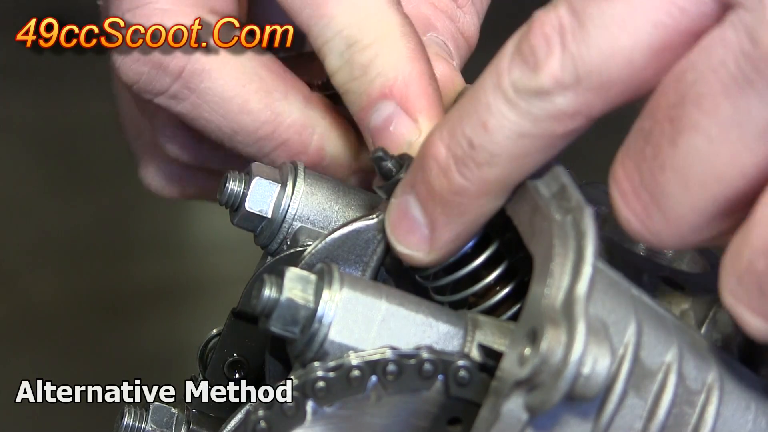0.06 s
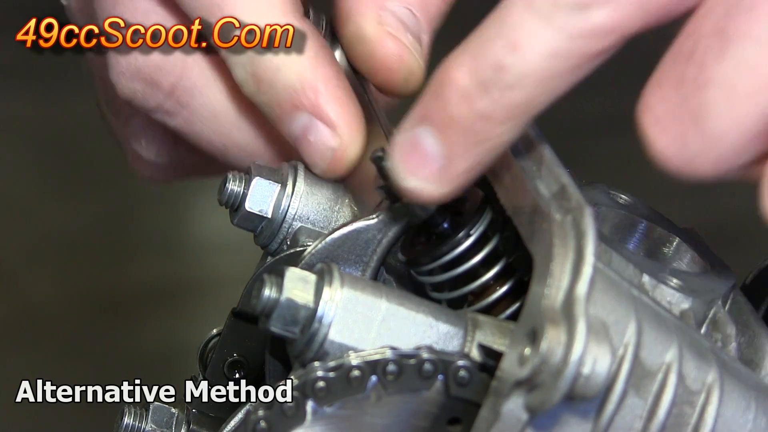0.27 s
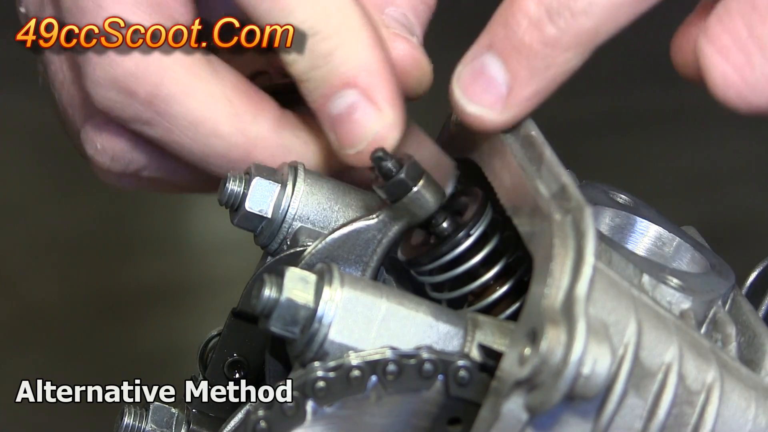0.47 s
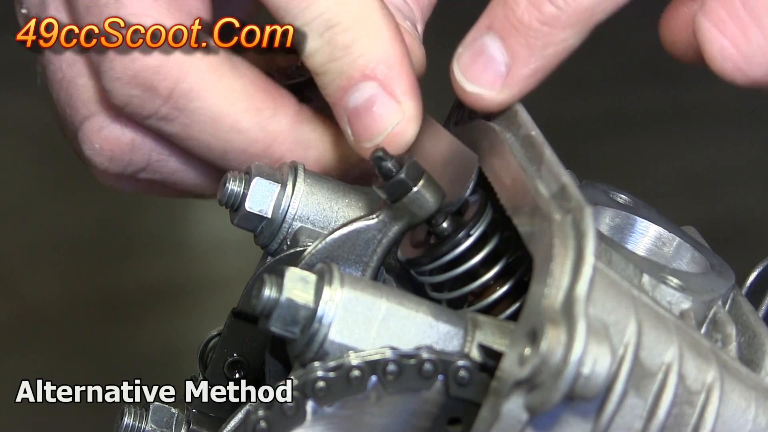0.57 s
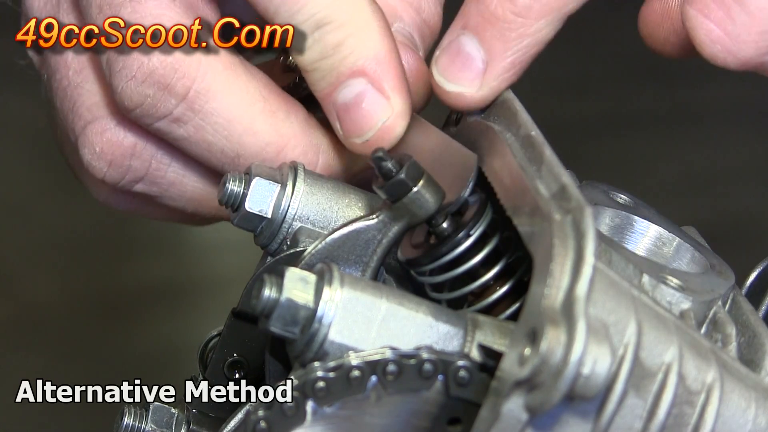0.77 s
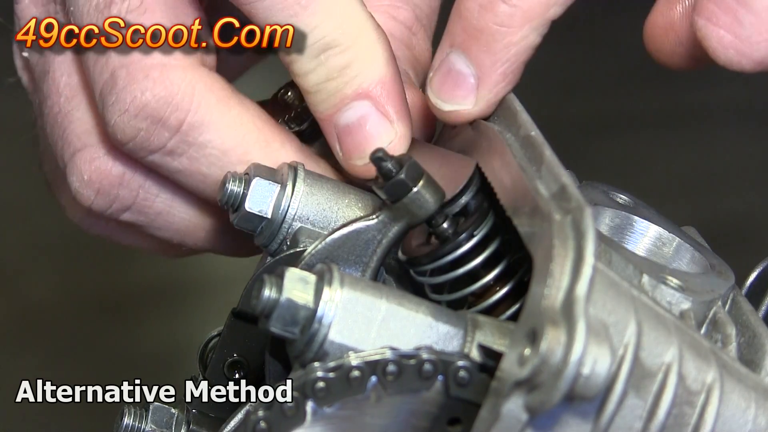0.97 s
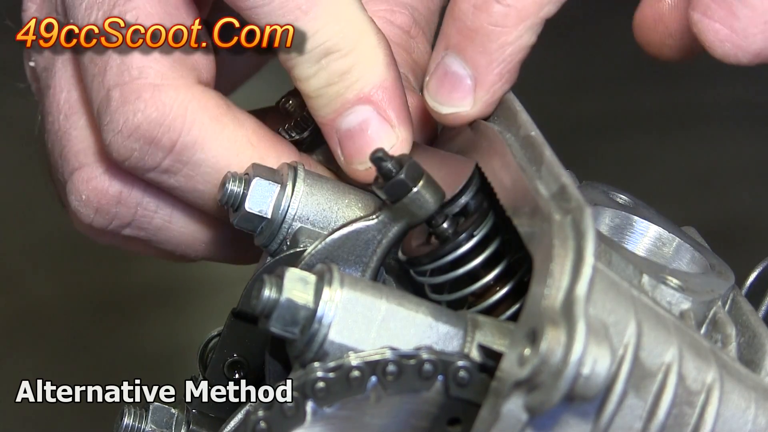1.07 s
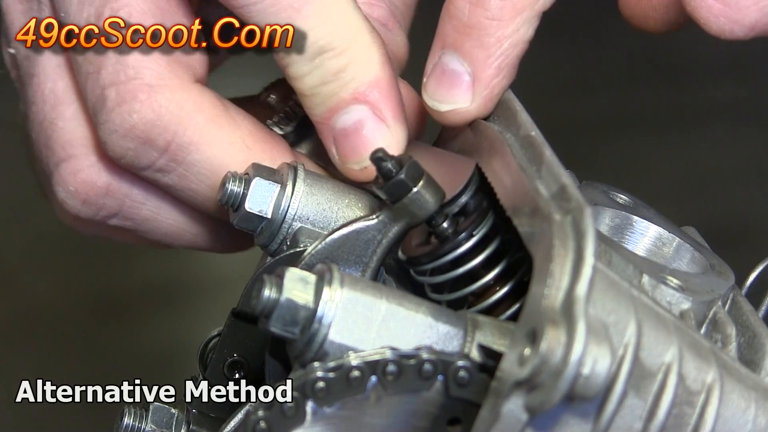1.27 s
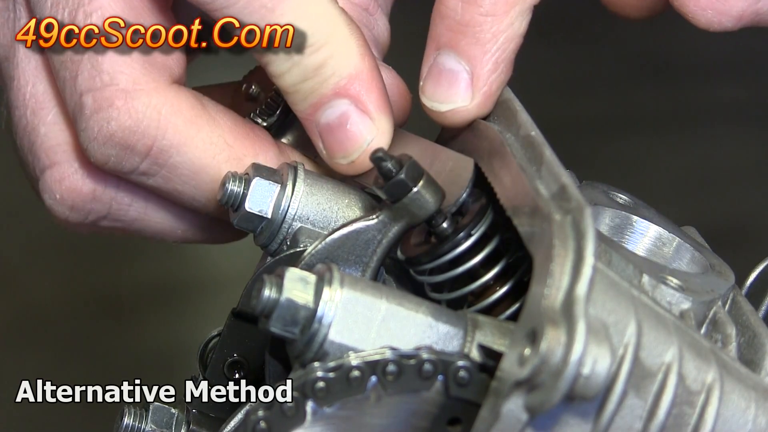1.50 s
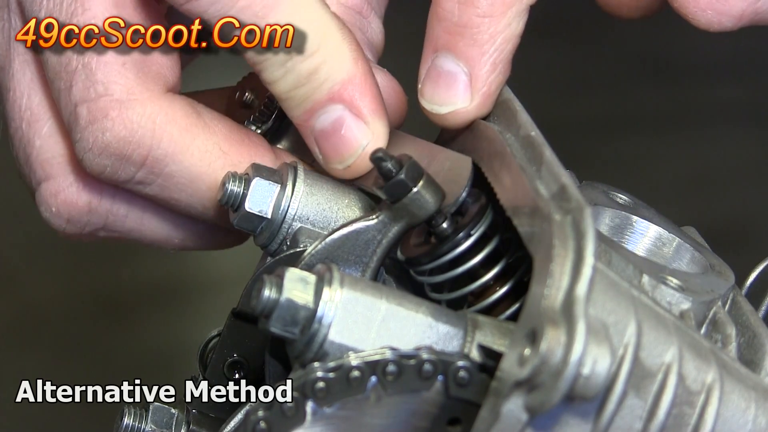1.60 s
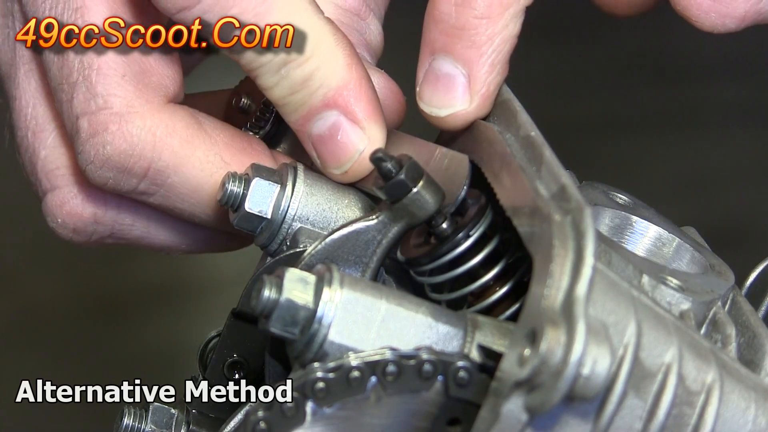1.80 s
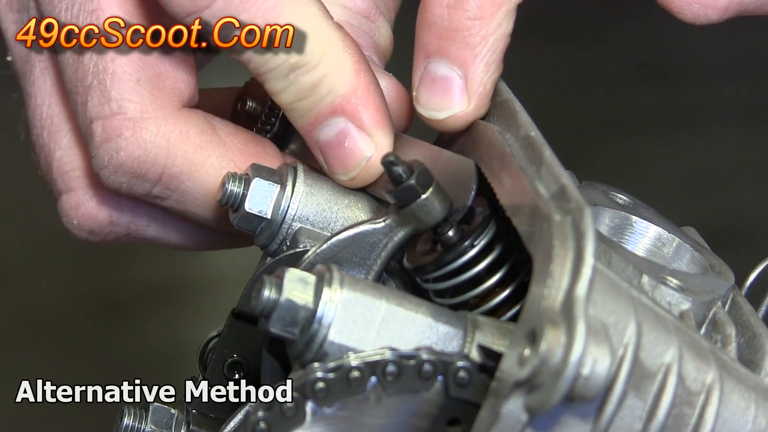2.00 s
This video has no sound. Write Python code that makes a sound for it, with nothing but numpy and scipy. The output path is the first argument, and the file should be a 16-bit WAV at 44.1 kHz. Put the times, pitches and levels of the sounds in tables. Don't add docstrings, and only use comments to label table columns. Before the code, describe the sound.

Metal clicking: thin steel blades knock and tick against small engine parts in a quiet workshop

```python
import sys
import numpy as np
from scipy import signal
from scipy.fft import rfft, irfft
from scipy.io import wavfile
from scipy.ndimage import uniform_filter1d

SR = 44100
rng = np.random.default_rng(int(sys.argv[2]) if len(sys.argv) > 2 else 0)


def voltage_ratio(level):
    return 10 ** (np.asarray(level, float) / 20)


def int16_out(signal):
    q = np.round(np.clip(np.atleast_2d(signal).T, -1, 1) * 32767)
    wavfile.write(sys.argv[1], SR, q.astype(np.int16))


N = 90404
RISE_MS = 0.46


def evened(x):
    return x / np.sqrt(np.mean(x ** 2) + 1e-20)


def read(points, hz):
    f, value = np.transpose(points)
    return np.interp(np.log(hz + 1), np.log(f + 1), value)


def add(mix, s, sound):
    part = mix[round(s * SR):][:len(sound)]
    part += sound[:len(part)]


def damped(peaks):
    narrowest_hz = 111
    modes = []
    for hz, width_hz, db in peaks:
        width_hz = max(width_hz, narrowest_hz)
        t60 = np.log(1000) / np.pi / width_hz
        modes.append((hz, db + 20 * np.log10(width_hz), t60))
    return modes


def ring(modes, t, force=np.ones(1), neighbour=-1.02):
    spot_db, detune, soft_turns = 1, 0.005, 0.9
    weakest_drive = 0.067
    hz, db, t60 = np.transpose([*modes, *modes])[:, :, None]
    spot, tune = rng.standard_normal((2, len(hz), 1))
    hz = hz * (1 + detune * tune)
    drive = abs(np.exp(2j * np.pi * hz * t[:len(force)]) @ force)[:, None]
    drive = np.maximum(drive, weakest_drive * np.linalg.norm(force))
    sign = neighbour ** (np.arange(len(hz))[:, None] % len(modes))
    decay = voltage_ratio(db + spot_db * spot - 60 * t / t60)
    swell = 1 - np.exp(-(hz * t / soft_turns) ** 2)
    return (sign * decay * swell * np.sin(2 * np.pi * hz * t) / drive).sum(0)


def whitened(force, push):
    size = np.linalg.norm(force)
    for _ in range(4):
        z = rfft(force, 2048)
        flat = irfft(z / (abs(z) + 1e-9))[:len(force)] * size
        force = np.clip(flat, -2.5 * push, 2.5 * push)
    return force


def chatter(chatter_ms, rise_ms):
    impacts_per_ms, spread_db = 14.0, 2
    ms = 1000 * np.arange(900) / SR
    hit, size, sign = rng.random((3, len(ms)))
    push = np.minimum(ms / rise_ms, 1) ** 2 * np.exp(-np.maximum(ms - rise_ms, 0) / chatter_ms)
    strength = voltage_ratio(-spread_db * np.log(size + 0.01))
    force = push * (hit < impacts_per_ms * 1000 / SR) * np.sign(sign - 0.5) * strength
    return whitened(force, push)


def click(parts, levels_db, chatter_ms, rise_ms=RISE_MS):
    blur = 6
    t = np.arange(1600) / SR
    force, out = chatter(chatter_ms, rise_ms), 0
    for db, modes in zip(levels_db, parts):
        mid = signal.fftconvolve(force, ring(modes, t, force))
        side = signal.fftconvolve(force, ring(modes, t, force))
        broad = [(hz, level, t60 / blur) for hz, level, t60 in modes]
        around = ring(broad, np.arange(len(mid)) / SR, neighbour=0.93)
        smooth = uniform_filter1d(abs(rfft(around)), size=50)
        around = np.roll(irfft(smooth, len(mid)), 40)
        around = evened(around) * mid.std()
        out = out + voltage_ratio(db) / abs(mid).max() * np.array([mid, side, around]).T
    return out


# (f/Hz, level/dB per Hz)
HISS = [(30, -42), (45, -18), (90, 0), (150, -0.5), (500, -4.5), (1860, -9), (5000, -18), (16000, -29.5)]
# (f/Hz, likeness 0-1)
COHERENCE = [(60, 1), (180, 0.38), (550, 0.25), (1650, 0.77), (4970, 0.61), (15000, 0.089)]


def hiss():
    frames, hz = N // 256 + 5, np.fft.rfftfreq(1024, 1 / SR)
    a, b, c, d = rng.standard_normal((4, len(hz), frames))
    same = np.clip(read(COHERENCE, hz), -1, 1)[:, None]
    left = a + 1j * b
    right = same * left + np.sqrt(1 - same ** 2) * (c + 1j * d)
    z = np.array([left, right]) * voltage_ratio(read(HISS, hz)[:, None])
    noise = signal.istft(z, nperseg=1024, noverlap=768)[1][:, :N]
    return voltage_ratio(-58) * evened(noise)


def drift(hz):
    t = np.arange(N) / SR
    return evened(sum(np.sin(2 * np.pi * (f * t + rng.random())) for f in np.geomspace(hz / 8, hz, 9)))


# (f/Hz, level/dB, waver/dB)
HUM = [(58, -64, -0.5), (115.1, -66, -3.5), (118.6, -85.5, 1)]


def hum():
    t, out = np.arange(N) / SR, 0
    for hz, db, waver_db in HUM:
        level = voltage_ratio(db + waver_db * drift(hz=16.0)) * np.sqrt(2)
        out = out + level * np.sin(2 * np.pi * hz * t + 0.38 * drift(hz=5.98))
    return out


# (f/Hz, level/dB, t60/s)
HEAD = [(412, -9.5, 0.02), (535, -4, 0.033), (653, -6, 0.022), (893, 0, 0.013), (993.5, -2, 0.045),
        (1269, 3, 0.015), (1680, 3, 0.0057)]
# (t/s, level/dB)
THUDS = [(0.206, -29), (.313, -37), (0.519, -37.5), (0.527, -36.5), (0.558, -50), (0.591, -40.5),
         (.625, -41), (0.65, -42.5), (.685, -49), (.948, -36.5), (.957, -42), (.967, -41), (1.005, -48.5),
         (1.457, -35.5), (1.480, -43), (1.9214, -48.5)]


def thuds(metal):
    for s, db in THUDS:
        add(metal, s, click([HEAD], [db], chatter_ms=2.7))


# (f/Hz, t60/s)
SHOP_DECAY = [(250, 0.95), (1000, 0.65), (2400, 0.81), (5000, 0.74), (9000, 0.6), (14000, 0.21)]
# (f/Hz, level/dB)
SHOP_COLOUR = [(300, 13), (1200, 8.5), (2400, 5.2), (5000, 0.7), (9000, -1), (14000, 6.5)]


def shop(x):
    tail_db, rise_s, same = -14, 0.0022, 0.88
    hz, t, z = signal.stft(rng.standard_normal((2, SR)), SR, nperseg=256)
    decay_db = 60 * t / read(SHOP_DECAY, hz)[:, None]
    z = z * voltage_ratio(read(SHOP_COLOUR, hz)[:, None] - decay_db)
    tail = signal.istft(z, SR, nperseg=256)[1]
    left, other = tail * np.minimum(np.arange(tail.shape[1]) / SR / rise_s, 1)
    right = same * left + np.sqrt(1 - same ** 2) * other
    tail = np.array([left, right]) * voltage_ratio(tail_db) / np.linalg.norm(left)
    return signal.fftconvolve(x[None], tail, axes=1)[:, :N]


# (f/Hz, width/Hz, level/dB)
ARM = [(1203, 360, -7.5), (1560, 83, -20.5), (2007, 150, -9), (2274, 150, -4), (2470, 84, -0.5),
       (2680, 80, -4), (2990, 360, -3.5)]
# (f/Hz, width/Hz, level/dB)
RETAINER = [(4040, 210, -19), (4810, 150, 2), (5050, 74, -2.5), (5600, 96, -4), (6000, 64, -4)]
# (f/Hz, level/dB, t60/s)
SCREW = [(6060, -25, 0.0092), (6300, -17, 0.012), (7040, 4, 0.0098), (7730, -1, 0.012), (8530, 4, 0.011),
         (8770, -5, 0.018), (9040, -3, 0.03), (9640, -5, 0.0097), (10420, -4, 0.0098), (11850, -13, 0.018),
         (13000, -13.5, 0.0068)]
# (t/s, chatter/ms, arm level/dB, retainer level/dB, screw level/dB)
KNOCKS = [
    (0.2066, 0.93, -26, -35, -55),
    (0.2079, 2, -10.5, -17.5, -12.5),
    (0.2137, 2.5, -21.5, -33, -26.5),
]


def knocks(metal):
    parts = damped(ARM), damped(RETAINER), SCREW
    for s, chatter_ms, *levels_db in KNOCKS:
        add(metal, s, click(parts, levels_db, chatter_ms))


# (t/s, f/Hz, level/dB, t60/s, rise/ms)
NUDGES = [(.225, 243.4, -48.5, 0.99, 25), (.255, 207, -40.5, 0.1, 8.6), (.33, 162, -52.5, 0.34, 11),
          (.53, 169, -48, 0.17, 15), (0.613, 148.3, -54.5, 0.39, 18), (1.007, 989, -48.5, 0.16, 5.8),
          (1.012, 4300, -71, 0.35, 3), (.655, 4900, -46.5, 0.096, 5), (1.462, 317, -56, 0.18, 2.8),
          (0.2066, 205, -46, 0.088, 1.7), (1.923, 603, -41, 0.02, 0.32)]


def nudges(body):
    t = np.arange(SR) / SR
    for s, hz, db, t60, rise_ms in NUDGES:
        swell = np.sin(np.pi / 2 * np.minimum(1000 * t / rise_ms, 1)) ** 2
        add(body, s, voltage_ratio(db - 60 * t / t60) * swell * np.sin(2 * np.pi * hz * t))


# (t/s, level/dB, f/Hz)
SNAPS = [
    (0.2081, -9, 4400),
    (0.5431, -22, 7400),
    (.9490, -25.5, 3880),
    (1.0137, -28, 5800),
]


def snaps(metal):
    for s, db, hz in SNAPS:
        u = np.arange(64) / SR * hz - 1.5
        pulse = -voltage_ratio(db) * (1 - 2 * (np.pi * u) ** 2) * np.exp(-(np.pi * u) ** 2)
        add(metal, s - 1.5 / hz, pulse[:, None] * [1, 0.6, 1])


# (f/Hz, level/dB, t60/s)
CASTING = [(1296, -4.5, 1.08), (1648, -7, 2.03), (2080, -27, 2), (2266, -7, 1.8), (2250, -21, 0.6),
           (2370, -0.5, 1.3), (2724, -17, 0.45), (2845, -19, 0.17), (2840, -16, 5.0)]


def casting(body):
    blur_hz, longest_s = 88.9, 1.2
    t, out = np.arange(SR) / SR, 0
    offsets = blur_hz * rng.standard_normal((len(CASTING), 18))
    for (hz, db, t60), row in zip(CASTING, offsets):
        decay = voltage_ratio(db - 60 * t / min(t60, longest_s))
        for b in row:
            out = out + decay * np.sin(2 * np.pi * (hz + b) * t + 99 * b)
    add(body, 0.209, voltage_ratio(-55) * out * np.minimum(t / 0.0028, 1))


# (f/Hz, level/dB, t60/s)
TAPPET = [(1990, -4.5, 0.016), (2655, -8, 0.041), (3000, -4.5, 0.021), (3190, -1, 0.013), (3600, -6, 0.008)]
STEM = [(3930, -0.5, 0.0091), (4170, -7.5, 0.037), (4590, 5, 0.014), (4800, 4.5, 0.004),
        (4940, 5.5, 0.0088), (5800, 3.5, 0.0039)]
BLADE = [(5990, 1, 0.014), (5730, -9.5, 0.014), (6250, 1, 0.015), (6610, 1.5, 0.013), (7100, 0.5, 0.014),
         (7640, 3.5, 0.0043)]
TIP = [(8660, -2, 0.0087), (8450, 9, 0.0068), (9330, 2.5, 0.0061), (9870, 9.5, 0.0059),
       (10770, 10.5, 0.007), (12180, 0.5, 0.0096), (11720, -9, 0.0065), (13200, -14, 0.012),
       (13400, -20, 0.006), (15300, -36, 0.0052)]
# (t/s, tappet level/dB, stem level/dB, blade level/dB, tip level/dB)
TICKS = [(0.2341, -54, -30.5, -30.5, -39), (0.3198, -40, -38.5, -41, -35), (.3285, -41, -54, -46, -43),
         (0.5428, -31.5, -35.5, -31, -31.5), (0.6593, -39, -41.5, -31.5, -45.5),
         (0.966, -50, -45, -52, -46), (0.9697, -36, -32, -36.5, -38), (0.9842, -39, -31.5, -22, -32),
         (0.982, -56, -41, -50, -55), (1.0024, -38.5, -64.5, -41, -34.5), (1.0047, -33, -30.5, -33.5, -27),
         (1.013, -30, -38.5, -24.5, -33), (1.3860, -59.5, -50, -45, -55.5),
         (1.4798, -31.5, -27.5, -30, -33.5), (1.9100, -59, -46, -56, -69.5)]


def ticks(metal):
    for s, *levels_db in TICKS:
        add(metal, s, click((TAPPET, STEM, BLADE, TIP), levels_db, chatter_ms=0.62))


# (f/Hz, level/dB, t60/s)
ROCKER = [(1540, -12, 0.028), (2020, 8, 0.026), (2170, -20, 0.045), (2350, 7, 0.018), (2660, -13, 0.005),
          (3100, 5, 0.018), (3120, -9, 0.0092)]
# (t/s, rocker level/dB, stem level/dB, blade level/dB, tip level/dB)
RUBS = [
    (0.3128, -30, -42, -36, -34.5),
    (0.3645, -44, -54, -53, -58),
    (.5235, -55, -61, -55, -43),
]


def rubs(metal):
    for s, *levels_db in RUBS:
        add(metal, s, click((ROCKER, STEM, BLADE, TIP), levels_db, chatter_ms=2.63, rise_ms=0.88))


def hold(metal, resonances, contacts):
    for s, chatter_ms, db in contacts:
        add(metal, s, click([damped(resonances)], [db], chatter_ms))


# (f/Hz, width/Hz, level/dB)
DRAGGED = [(1116, 20, -7.5), (1975, 45, 4), (2420, 44, -9.5), (3000, 34, -0.5), (3830, 96, -14),
           (4500, 70, -7), (4860, 71, -12.5), (5790, 96, -2.5), (6720, 45, -7.5), (7640, 43, -13),
           (8300, 28, -17), (8500, 35, -19)]
# (t/s, chatter/ms, level/dB)
DRAGS = [
    (.5165, 3.4, -30),
    (0.5218, 3.7, -27.5),
    (0.5271, 1.6, -27),
    (.532, 2.1, -32.5),
]


def drags(metal):
    hold(metal, DRAGGED, DRAGS)


# (f/Hz, width/Hz, level/dB)
TAPPED = [(990, 230, 2.5), (1950, 280, 0.5), (2330, 80, -1), (3010, 240, 1), (3900, 110, -14),
          (4490, 130, -2), (5630, 140, -19), (6700, 210, -9)]
# (t/s, chatter/ms, level/dB)
TAPS = [
    (0.5924, 1.4, -27),
    (0.6498, 1.302, -27.5),
]


def taps(metal):
    hold(metal, TAPPED, TAPS)


# (f/Hz, width/Hz, level/dB)
SEATED = [(1610, 540, 2.5), (2730, 250, -0.5), (4130, 130, 1), (6830, 340, -6), (7400, 250, -11),
          (8200, 300, -10.5), (10400, 640, -14), (11900, 560, -13), (14000, 250, -25), (15140, 520, -27)]
# (t/s, chatter/ms, level/dB)
SEATS = [
    (0.9475, 0.91, -22),
    (0.9536, 2.1, -32),
]


def seats(metal):
    hold(metal, SEATED, SEATS)


# (f/Hz, width/Hz, level/dB)
PINCHED = [(2010, 56, -1.5), (3170, 450, -4.5), (3750, 71, -0.5), (4380, 330, -11.5), (5290, 106, 3),
           (5920, 100, -2), (6340, 160, 3.5), (7260, 540, -14.5), (8350, 150, -4.5), (8840, 255, -8),
           (9540, 250, -5.5), (10000, 310, -1), (11030, 900, -1.5), (11930, 250, -1)]
# (t/s, chatter/ms, level/dB)
PINCHES = [
    (1.4572, 0.831, -8.5),
    (1.4605, 2.29, -29),
]


def pinches(metal):
    hold(metal, PINCHED, PINCHES)


def scene():
    metal, body = np.zeros((N, 3)), np.zeros(N)
    for contact in (thuds, knocks, snaps, ticks, rubs, drags, taps, seats, pinches):
        contact(metal)
    nudges(body)
    casting(body)
    mid, side, around = metal.T
    off_axis = voltage_ratio(-16) * signal.lfilter([1, -1], 1, side)
    near = mid + off_axis * [[1], [-1]]
    right_db = 0.52
    return (near + body + hum() + shop(around) + hiss()) * voltage_ratio(np.array([[0], [right_db]]))


def low_pass(x):
    return signal.sosfilt(signal.butter(12, 16640, fs=SR, output="sos"), x)


def record(dry):
    low_cut = signal.butter(4, 60, "high", fs=SR, output="sos")
    mix = signal.sosfilt(low_cut, dry)
    return low_pass(mix)


dry = scene()
out = record(dry)
int16_out(out)
```